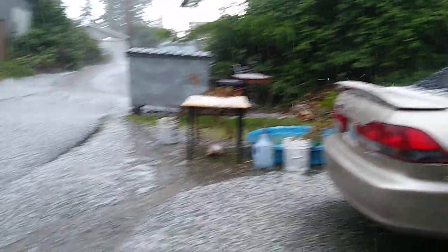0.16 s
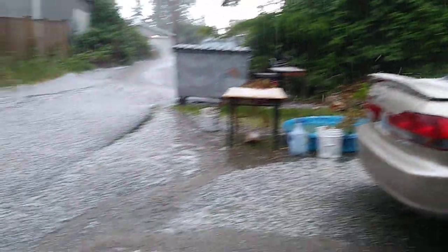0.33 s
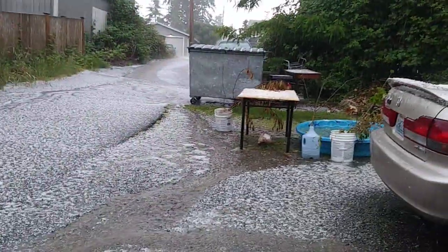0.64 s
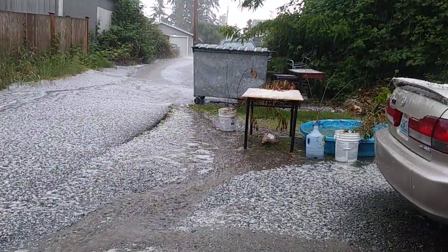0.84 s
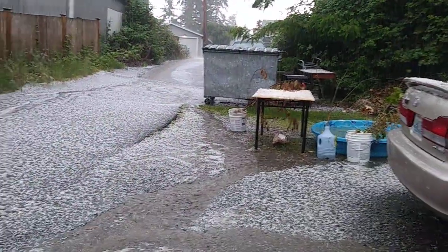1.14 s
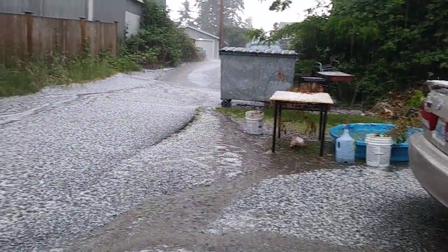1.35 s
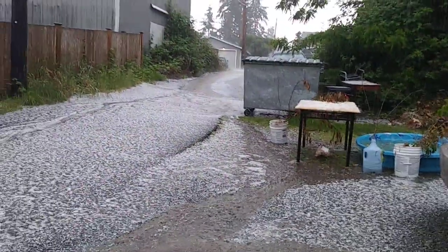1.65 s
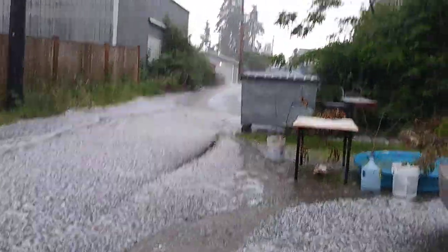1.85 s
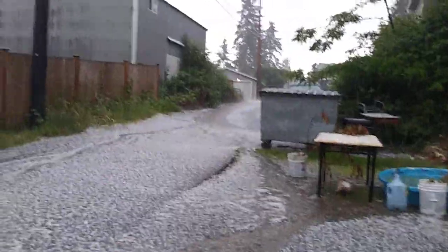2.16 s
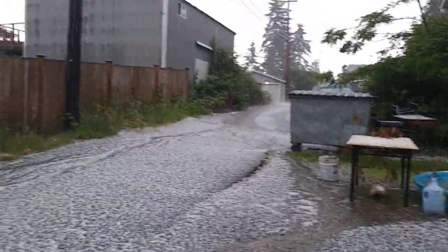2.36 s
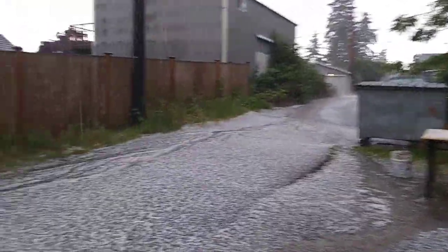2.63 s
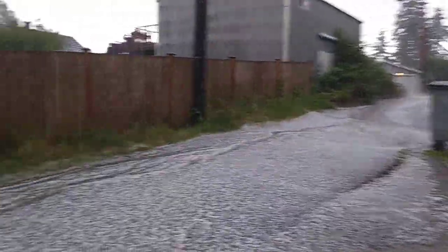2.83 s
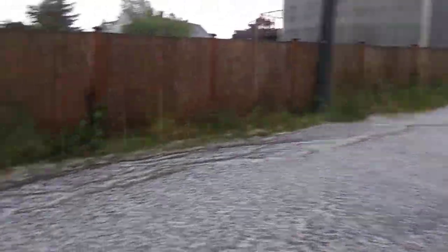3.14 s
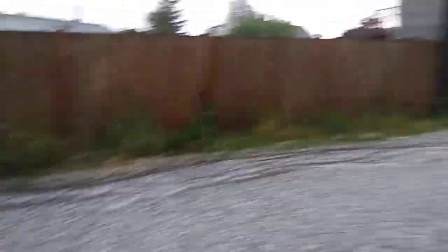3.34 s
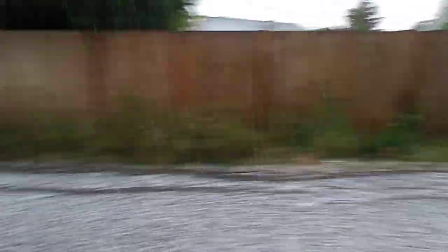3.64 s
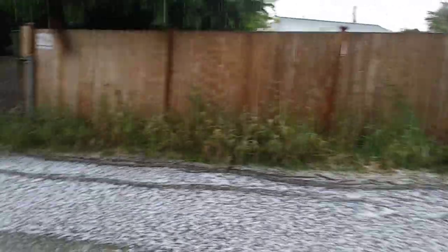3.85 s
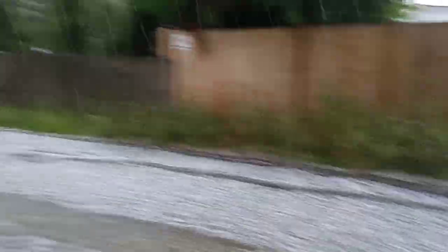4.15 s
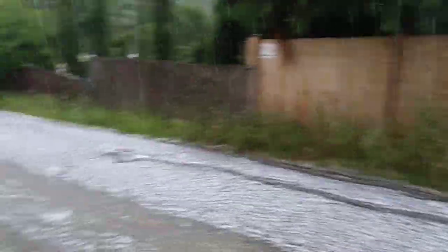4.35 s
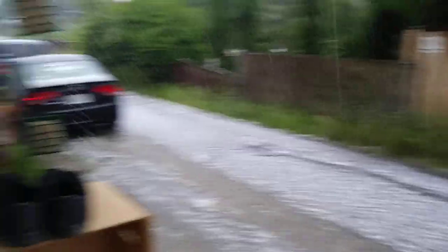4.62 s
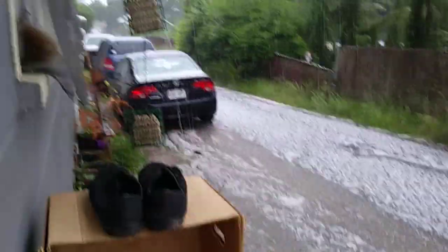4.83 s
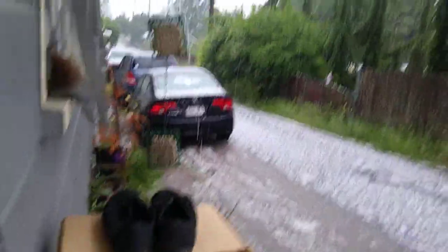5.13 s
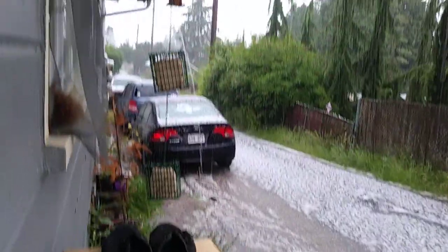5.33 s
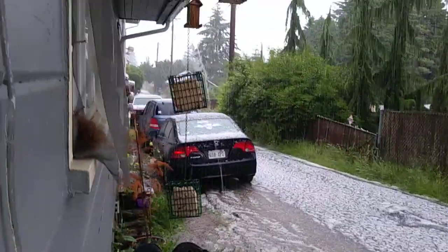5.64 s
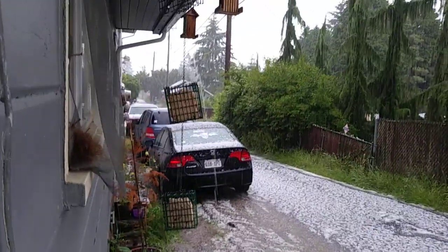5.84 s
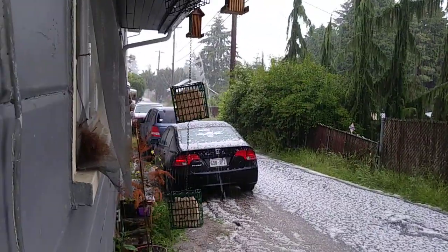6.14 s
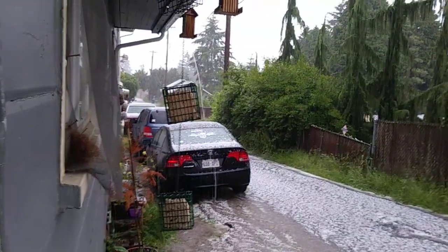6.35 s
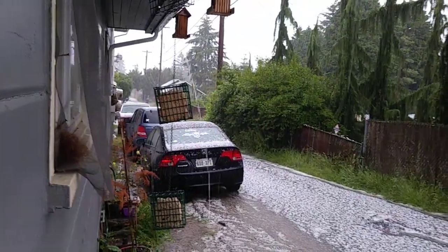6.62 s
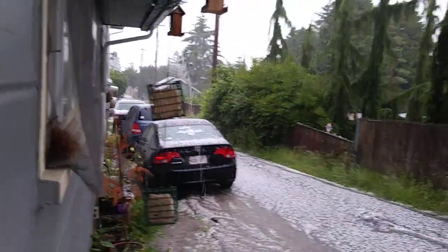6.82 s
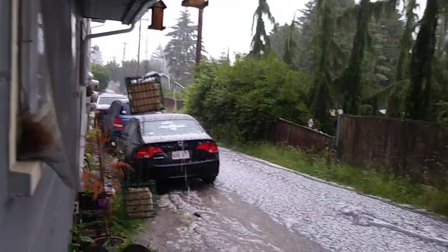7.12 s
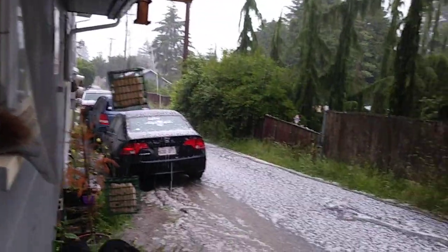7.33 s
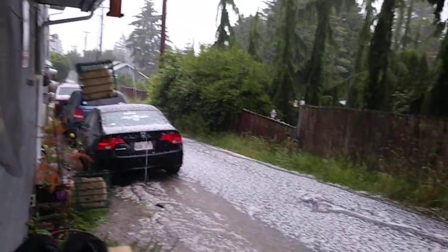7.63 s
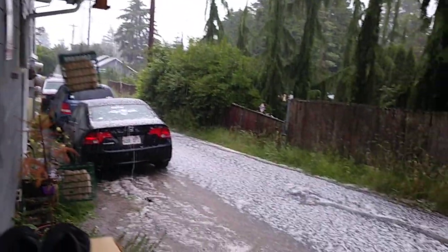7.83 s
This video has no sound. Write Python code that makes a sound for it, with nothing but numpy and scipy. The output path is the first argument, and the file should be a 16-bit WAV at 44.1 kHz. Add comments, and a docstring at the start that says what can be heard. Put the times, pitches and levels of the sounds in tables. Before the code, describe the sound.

Hail hammers a lane, parked cars and a house front without pause. The bed is a thick, crisp wash of countless impacts with a faint low roof boom. Close stones snap, clack and tick at random, some knocking on hollow plastic or board, some ringing short on metal. The hiss is fullest at the start, thins a little around four seconds as the close-up microphone swings round, then continues steadily to the end with dry outdoor closeness.

```python
"""A gravel lane with cars and a house front, in heavy hail and rain, heard from a doorway by a turning microphone.
Far drops blend into a hiss of filtered noise; nearer stones are random bursts of noise and decaying modes.
The nearest crack singly as noise in four bands; others ring a metal gutter or drum on hollow tubs, as modes.
The loudest cracks press the microphone into soft overload."""
import sys
import numpy as np
from scipy import signal
from scipy.fft import rfft, irfft, next_fast_len
from scipy.io import wavfile
from scipy.ndimage import uniform_filter1d

SR = 44100
rng = np.random.default_rng(int(sys.argv[2]) if len(sys.argv) > 2 else 0)


def store_pcm(level_fs):
    """Save levels as 16-bit WAV."""
    pcm = np.round(np.clip(level_fs, -1, 1) * 32767).astype(np.int16)
    wavfile.write(sys.argv[1], SR, np.atleast_2d(pcm).T)


N = 351918  # length [samples]

# spectral shape of a nearer impact: (frequency [Hz], relative level [dB per Hz])
IMPACT_SPECTRUM = [(40, -33), (150, -13.5), (500, -19.5), (1300, -8), (2500, -5.5), (4900, 3), (5600, -1),
                   (8200, -10), (11300, -13.5), (14000, -22.5), (16000, -4)]


def gain_of(db):
    """Level law: an amplitude ratio is ten to the power of decibels over 20."""
    return 10 ** (np.asarray(db) / 20)


def evened(x):
    """Normalisation: scales a signal to an rms of 1."""
    return x / np.sqrt(np.mean(x ** 2) + 1e-20)


def read(points, hz):
    """Interpolation of a spectrum along a logarithmic frequency axis."""
    f, value = np.transpose(points)
    return np.interp(np.log(hz + 1), np.log(f + 1), value)


def add(mix, s, sound):
    """Superposition: adds a sound to the mix from time s on, cut at the end of the mix."""
    part = mix[round(s * SR):][:len(sound)]
    part += sound[:len(part)]


def coloured(x, gain):
    """Linear filtering: multiplies the spectrum of x by a gain that is a function of frequency."""
    size = next_fast_len(len(x))
    spectrum = rfft(x, size) * gain(np.fft.rfftfreq(size, 1 / SR))
    return irfft(spectrum, size)[:len(x)]


def ring(hz, t60, rise_cycles=1.67, bend=1.06):
    """Modal resonance: a sine builds up over its first cycles; the wet surface chokes it ever faster."""
    t = np.arange(8000) / SR
    decay = gain_of(-60 * (t / t60) ** bend)  # bend above 1: the decay steepens
    swing = decay * np.minimum(t * hz / rise_cycles, 1)
    return swing / swing.max() * np.sin(2 * np.pi * hz * t)


def hiss(patchy_db=1.5, flicker_db=0.2675):
    """Central limit: countless far drops sum to Gaussian noise, with drifting patches and a common flicker."""
    # spectral shape of far rain and hail: (frequency [Hz], relative level [dB per Hz])
    far_spectrum = [(15, -55), (40, -21), (102, -9.5), (370, -10), (555, -8), (788, -8.5), (2080, -10.5),
                    (4930, 2), (5400, 1), (8220, -15), (11300, -14), (12200, -16.5), (14300, -11.5),
                    (15700, -12.5)]
    # the roof overhead booms in one low band: (centre [Hz], width [Hz], boost [dB])
    roof_boom = (98.45, 43.87, 7)
    frames = N // 128 + 5
    real, imaginary, patches = rng.standard_normal((frames, 257, 3)).T
    patches = uniform_filter1d(patches, size=8, axis=0)
    patches = evened(uniform_filter1d(patches, size=8, axis=1))
    flicker = evened(uniform_filter1d(rng.standard_normal(frames), size=6))
    spectra = (real + 1j * imaginary) * gain_of(patchy_db * patches + flicker_db * flicker)
    flat = signal.istft(spectra, nperseg=512, noverlap=384)[1][:N]
    boom_hz, width_hz, boom_db = roof_boom

    def colour(f):
        boom = boom_db / (1 + (2 * (f - boom_hz) / width_hz) ** 2)
        return gain_of(read(far_spectrum, f) + boom)

    return evened(coloured(flat, colour))


def spatter(per_s=300, spread_db=3.0, t60=0.0094, above_hz=3500):
    """Shot noise: small drops burst close by at random instants, as brief bright decaying ticks."""
    size = gain_of(spread_db * np.minimum(rng.exponential(1, N), 4))
    blows = size * (rng.random(N) < per_s / SR)
    decay = gain_of(-60 * np.arange(2000) / SR / t60)
    ticks = signal.oaconvolve(blows, decay)[:N] * rng.standard_normal(N)

    def bright(f):
        return gain_of(0.8438 * read(IMPACT_SPECTRUM, f)) / (1 + (above_hz / (f + 1)) ** 4)

    return evened(coloured(ticks, bright))


def pelting(per_s=350, spread_db=3.5, breadth=0.7545, t60=0.06617, ringing=0.5424, count=32):
    """Impulse response: stones at random instants each excite a noisy crack and three modes of what they strike."""
    size = gain_of(spread_db * np.minimum(rng.exponential(1, N), 3))
    blows = size * (rng.random(N) < per_s / SR)
    struck = rng.integers(0, count, N)  # which of the surfaces is hit
    t, out = np.arange(4096) / SR, np.zeros(N)
    for k in range(count):
        centre_hz = 200 * 65 ** ((k + rng.random()) / count)
        lasting = t60 * rng.uniform(0.1478, 2.3248)
        # the short scatter of echoes is decaying noise
        crack = rng.standard_normal(len(t)) * gain_of(-60 * t / lasting) * np.minimum(t / 0.0011, 1)
        crack = coloured(crack, lambda f: 0.15 + np.exp(-(np.log((f + 1) / centre_hz) / breadth) ** 2))
        modes = sum(ring(centre_hz * r, 1.0886 * lasting)[:len(t)] for r in rng.uniform(.75, 1.2, 3))
        response = evened(crack) + ringing * evened(modes)
        out += signal.oaconvolve(blows * (struck == k), response)[:N]
    return evened(coloured(out, lambda f: gain_of(read(IMPACT_SPECTRUM, f))))


def shower():
    """Spectral balance: the registers of the fall swell apart as walls and open air pass behind the microphone."""
    # the downpour as the microphone turns: (time [s], hiss level [dB], top treble level [dB])
    swells = [(0.0, -14, -38), (0.87, -13.5, -40.5), (1.42, -13.5, -36), (2.15, -14.5, -38),
              (2.45, -14.5, -36), (3.27, -15.5, -36.5), (3.82, -16, -38), (4.2, -17, -41), (4.4, -17, -38),
              (4.5, -17, -35), (4.75, -15.5, -30), (4.92, -16, -31.5), (5.05, -16.5, -38.5),
              (5.5, -16.5, -38), (6.15, -16.5, -40.5), (7.0, -15.5, -33.5), (7.5, -16.5, -40),
              (7.98, -16.5, -36)]
    # where wash, hiss, sheen and top meet: frequencies [Hz]
    crossovers_hz = [700, 7500, 11500]
    wash_db, wash_follows = -30.5, 0.945  # mean level [dB]; dB per dB of hiss swell
    sheen_db, sheen_follows_hiss, sheen_follows_top = -31, 0.21, 0.25  # mean level [dB]; dB per dB
    s, hiss_db, top_db = np.transpose(swells)
    swell_db, airy_db = hiss_db - hiss_db.mean(), top_db - top_db.mean()
    levels_db = [wash_db + wash_follows * swell_db,
                 hiss_db,
                 sheen_db + sheen_follows_hiss * swell_db + sheen_follows_top * airy_db,
                 top_db]
    fall = hiss() + gain_of(-3.5) * pelting() + gain_of(-6.5) * spatter()
    lowpassed = [coloured(fall, lambda f: 1 / (1 + (f / hz) ** 8)) for hz in crossovers_hz]
    below = [0] + lowpassed + [fall]
    t, out = np.arange(N) / SR, np.zeros(N)
    for db, lower, upper in zip(levels_db, below, below[1:]):
        out += gain_of(np.interp(t, s, db)) * evened(upper - lower)
    return out


def drums():
    """Modal excitation: a hollow thing answers with a tone, a weaker overtone and a brief body; one blow thuds."""
    # stones on tubs, buckets and boards: (time [s], relative blow [dB], tone [Hz])
    tub_blows = [(0.119, -17.5, 680), (0.382, -12.5, 524), (0.384, -16, 324), (0.51, -14.5, 1690),
                 (0.595, -10.5, 1830), (0.597, -11, 304.6), (0.613, -17.5, 496), (0.761, -10.5, 310),
                 (0.823, -14.5, 719.5), (1.225, -18, 580), (1.256, -17, 590.5), (1.264, -19, 294.1),
                 (1.379, -13.5, 420), (1.381, -17, 534.4), (1.47, -17, 443), (1.5, -15, 748.7),
                 (1.88, -18, 338.5), (2.578, -12.5, 302), (2.841, -14.5, 1907), (3.502, -13, 1871),
                 (4.024, -15, 2180), (4.345, -23, 1810), (5.291, -18.5, 945), (6.086, -21.5, 405),
                 (6.474, -19, 423), (6.477, -15, 591.1), (6.689, -22, 1350), (6.968, -12, 1616),
                 (7.095, -14.5, 1250), (7.095, -12, 766), (7.494, -11, 1582), (7.748, -14, 1559),
                 (7.879, -17, 297), (7.881, -10.5, 973.7)]
    # one dead low thump: (time [s], blow [dB], tone [Hz], nominal t60 [s])
    low_thump = (3.6005, -10.5, 172, 0.024)
    t60_at_1khz, shorter = 0.04237, 0.33  # [s]; higher tones die sooner, by this power of the pitch
    out = np.zeros(N)
    for s, blow_db, hz in tub_blows:
        t60 = t60_at_1khz * (1000 / hz) ** shorter
        overtone = 0.46 * ring(1.9 * hz, 0.75 * t60)
        body = 0.43 * ring(1.34 * hz, 0.45 * t60)
        add(out, s, gain_of(blow_db) * (ring(hz, t60) + overtone + body))
    s, blow_db, hz, t60 = low_thump
    add(out, s, gain_of(blow_db) * ring(hz, t60))
    return out


def gutter():
    """Modal participation: each stone rings the same metal modes, in random shares for where it lands."""
    # stones on the gutter: (time [s], relative blow [dB], damping as a factor on t60 [1])
    gutter_blows = [(0.4788, -12, 0.97), (1.0261, -14.5, 0.524), (1.4391, -12.5, 0.71), (2.014, -11, 0.75),
                    (2.321, -11.5, 1), (2.3596, -12, 0.863), (2.4072, -10, 0.6625), (2.431, -20, 0.72),
                    (2.4488, -6, 1), (3.3065, -16.5, 1), (4.513, -9, 0.943)]
    # modes of the metal: (frequency [Hz], relative level [dB], t60 before damping [s])
    metal_modes = [(1007.1, -21, 0.0889), (1160, -6.5, 0.03913), (1332.6, 0.6, 0.081), (1457, -15.5, 0.027),
                   (1690, -8.5, 0.073), (1970, -6, 0.032)]
    out = np.zeros(N)
    shares = gain_of(2.5 * rng.standard_normal((len(gutter_blows), len(metal_modes))))
    for (s, blow_db, damping), share in zip(gutter_blows, shares):
        modes = sum(g * gain_of(db) * ring(hz, t60 * damping)
                    for g, (hz, db, t60) in zip(share, metal_modes))
        add(out, s, gain_of(blow_db) * modes)
    return out


def stones(crest=2.92, tick=0.51):
    """Impact and damping: a sharp tick of contact, then noise in four bands, each decaying at its own rate."""
    # the nearest stones: (time [s], relative blow [dB], surface pitch [octaves above 1 kHz], nominal t60 [s])
    near_blows = [(0.0633, -3.5, 2.45, 0.06), (0.2466, -4.5, 3.4, 0.12), (0.376, 6, 3.035, 0.0631),
                  (0.4324, 3, 1.11, 0.06), (0.4786, 2, 1.1, 0.1013), (0.543, 1, 2.4, 0.049),
                  (0.608, 2.5, 2.3, 0.127), (0.6825, -1, 1.6, 0.1377), (0.7752, 5.5, 2.2, 0.0826),
                  (0.817, 2, 1.4, 0.034), (0.876, 2, 2.6, 0.06), (0.9562, 3.5, 2.4, 0.055),
                  (0.9924, 2.5, 1.9, 0.06), (1.155, 5, 0.96, 0.077), (1.2146, 4.5, 1.983, 0.27),
                  (1.2906, 9, 2.3, 0.0524), (1.322, 4.5, 2.1, 0.0677), (1.3753, 0.5, 2.6, 0.08),
                  (1.439, 6, 1.344, 0.044), (1.5736, 6, 1.7495, 0.06), (1.6556, 6.5, 2.015, 0.03),
                  (1.708, 7, 1.1746, 0.1224), (1.803, -0.5, 1.01, 0.1005), (2.004, 3, 1.167, 0.0901),
                  (2.14, 5, 2.471, 0.05136), (2.2872, 20, 5.7, 0.0542), (2.3583, 1, 1.6, 0.0808),
                  (2.4078, 5, 1.9684, 0.1377), (2.4463, 2.5, 1.87, 0.111), (2.635, 2.5, 1.8, 0.1082),
                  (2.8386, 3, 2.3, 0.053), (2.9362, 1.5, 2.121, 0.2237), (2.98, 1.5, 1.641, 0.07),
                  (3.11, 2, 2.637, 0.0788), (3.265, 6, 2.497, 0.054), (3.3043, 2.5, 2.393, 0.08),
                  (3.3504, 3, 2.6, 0.12), (3.514, 5, 2.0394, 0.084), (3.544, 3.5, 2.001, 0.1336),
                  (3.6435, 5, 2.053, 0.054), (3.708, 3.5, 1.8186, 0.0688), (3.9757, 5, 2.3, 0.063),
                  (4.0213, 3.5, 2.007, 0.0612), (4.2266, -4.5, 0.5325, 0.136), (4.343, 4, 0.99, 0.09),
                  (4.372, -1.5, 2.71, 0.09), (4.4697, 0.5, 1.6, 0.0998), (4.515, 2.5, 1.3, 0.0618),
                  (4.592, 7.5, 4.1, 0.025), (4.594, -1.5, 1.1, 0.03825), (4.6877, 6, 2.826, 0.055),
                  (4.7142, 3, 1.973, 0.084), (4.739, 2.5, 3.496, 0.067), (4.7765, -0.5, 3.355, 0.04),
                  (4.842, 2.5, 2.24, 0.0741), (5.3504, 2.5, 1.285, 0.1631), (5.421, -0.5, 2.4, 0.063),
                  (5.5608, -1, 1.017, 0.0711), (5.684, 5, 2.6, 0.048), (5.7289, 2, 2.247, 0.326),
                  (5.8506, 2, 2.4, 0.1548), (6.0185, 4.5, 2.355, 0.0448), (6.0664, 4.5, 2.705, 0.27),
                  (6.258, 2, 1.318, 0.06), (6.2888, 1.5, 1.3, 0.076), (6.379, 2.5, 3.593, 0.03),
                  (6.3973, 8.5, 1.3476, 0.14), (6.4732, 3.5, 3.374, 0.073), (6.5487, 5.5, 1.974, 0.1019),
                  (6.66, 2.5, 2.1, 0.043), (6.9745, 0.5, 2.44, 0.0493), (7.0449, 1, 3.516, 0.06),
                  (7.0958, 1.5, 1.296, 0.06), (7.1197, -1, 0.947, 0.084), (7.3068, 6, 1.984, 0.05074),
                  (7.494, 2.5, 2.68, 0.048), (7.5662, 3, 2.134, 0.0503), (7.668, -3, 2.183, 0.055),
                  (7.7495, 4, 2.3, 0.0577), (7.8535, -0.5, 2.1, 0.13)]
    # crack, knock, clack and snap: (lower edge [Hz], upper edge [Hz])
    band_edges_hz = [(4000, 7000), (900, 2200), (2200, 4000), (7000, 16000)]
    # a full blow in each of these bands: relative level [dB]
    band_levels_db = [0.6, -6, -3, -9.5]
    decay_factors = [0.4608, 1.555, 0.84, 0.8226]  # on t60, band by band
    # bands fade with distance from the surface pitch, more steeply for a stone that rings long
    fall_db_per_octave, ring_narrows = 6.5, 40  # [dB/octave]; extra dB/octave per second of t60
    stray_count = 80  # softer stones at random moments
    stray_db, stray_spread_db = -5, 5  # loudest blow and range below it [dB]
    stray_octave, stray_octaves, stray_t60_s = 2.45, 0.7, 0.035  # mean pitch, its deviation, median t60

    t, out = np.arange(6000) / SR, np.zeros(N)
    contact = np.minimum(t / 0.00074, 1) * (1 + tick * np.exp(-t / 0.001558))
    u = rng.random((stray_count, 2))
    g = rng.standard_normal((stray_count, 2))
    strays = np.transpose([u[:, 0] * N / SR,
                           stray_db - stray_spread_db * u[:, 1],
                           stray_octave + stray_octaves * g[:, 0],
                           stray_t60_s * np.exp(0.162 * g[:, 1])])
    for (lo_hz, hi_hz), band_db, slower in zip(band_edges_hz, band_levels_db, decay_factors):
        def band(f):
            edges = (1 + (lo_hz / (f + 1)) ** 8) * (1 + (f / hi_hz) ** 8)
            return gain_of(read(IMPACT_SPECTRUM, f)) / edges

        envelope = np.zeros(N)
        middle = np.log2(np.sqrt(lo_hz * hi_hz) / 1000)  # octaves above 1 kHz
        for s, blow_db, octave, t60 in [*near_blows, *strays]:
            slope = fall_db_per_octave + ring_narrows * t60
            peak_db = blow_db + band_db - slope * abs(octave - middle)
            decay_db = -60 * t / (max(t60, .01) * slower)
            add(envelope, s, gain_of(peak_db + decay_db) * contact)
        out += envelope * evened(coloured(rng.standard_normal(N), band)) / crest
    return out


def scene():
    """Superposition: single blows stand on top of the shower."""
    return (shower() + drums() + gutter() + stones())[None]


def record(dry):
    """Saturation and band limit: peaks over a knee bend toward a ceiling, then a low-pass trims the top."""
    knee, ceiling, edge_hz = .6, .84, 15720
    room = ceiling - knee
    over = np.maximum(abs(dry) - knee, 0)
    bent = dry - np.sign(dry) * (over - room * np.tanh(over / room))
    lowpass = signal.firwin(1023, edge_hz, window=("kaiser", 9), fs=SR)
    return signal.oaconvolve(bent, lowpass[None], "same")


dry = scene()
out = record(dry)
store_pcm(out)
```